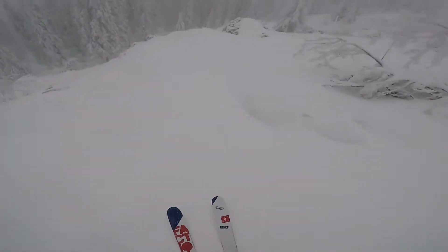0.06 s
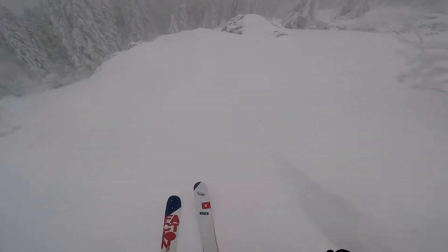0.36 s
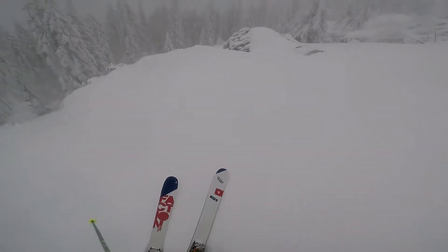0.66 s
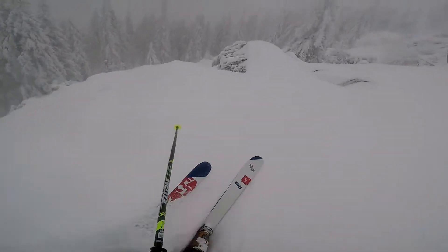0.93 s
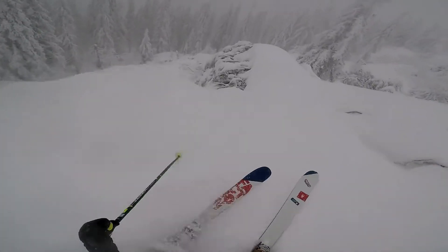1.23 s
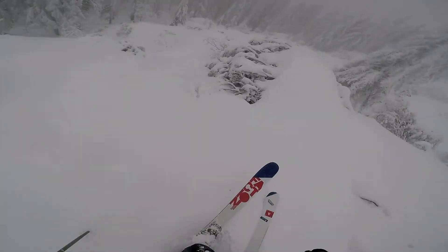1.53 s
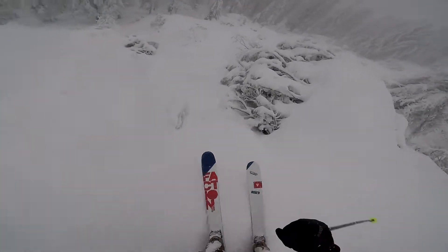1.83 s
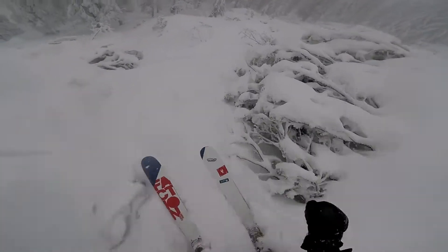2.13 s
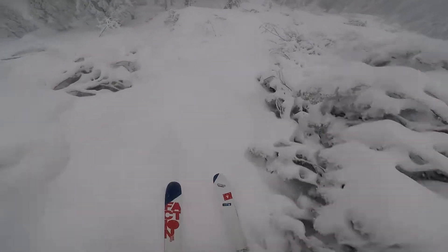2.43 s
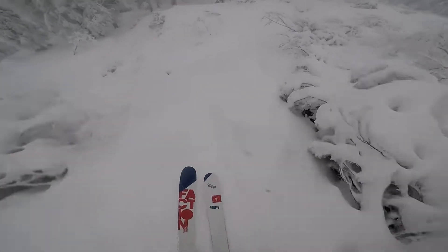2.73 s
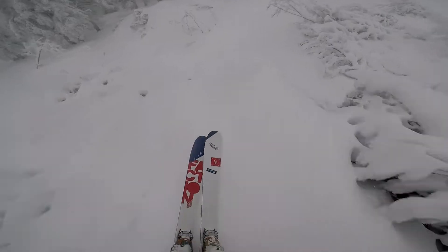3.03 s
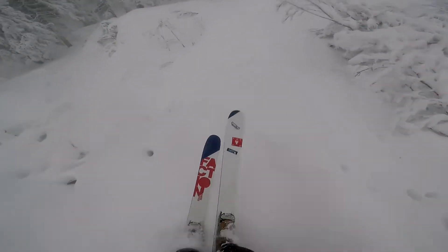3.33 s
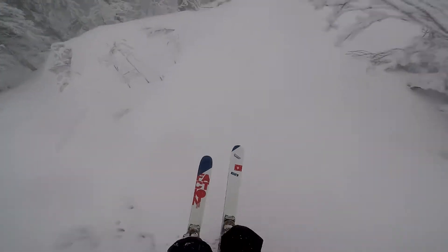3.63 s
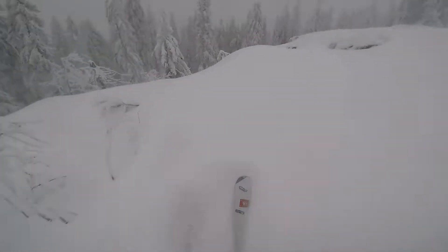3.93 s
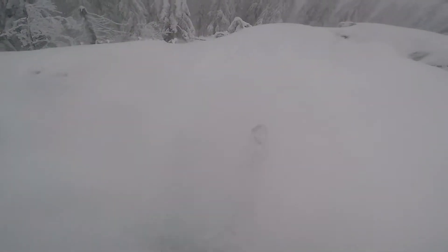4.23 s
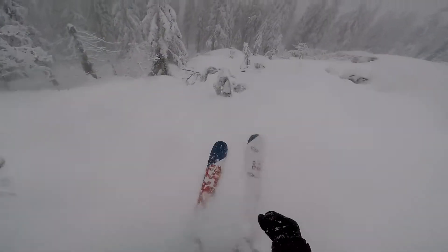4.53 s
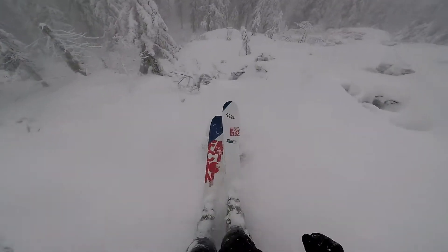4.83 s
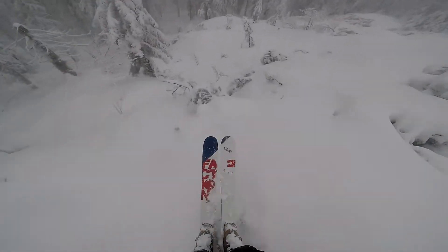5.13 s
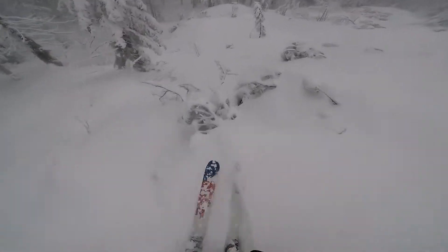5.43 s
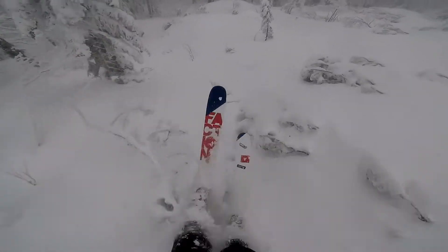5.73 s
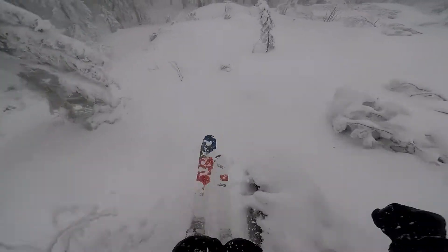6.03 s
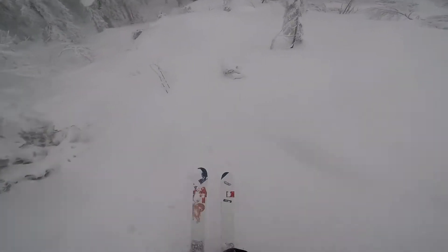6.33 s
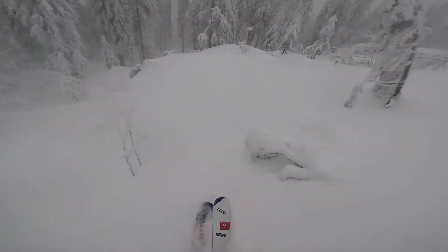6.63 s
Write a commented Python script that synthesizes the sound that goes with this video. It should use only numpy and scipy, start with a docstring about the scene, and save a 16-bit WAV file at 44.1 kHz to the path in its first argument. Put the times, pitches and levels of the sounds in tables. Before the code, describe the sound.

Close, rough gusts of wind hit a body-worn microphone on a run down a snowy slope. Skis surge through the powder, each push a grinding swish with a hiss of spray and a faint hollow ring. Crust crunches, the skis click and clack, and the camera mount takes a few low knocks. The wind is strongest at the start, in the middle and at the end, with a rumble underneath throughout.

```python
"""Buffeting gusts over a low rumble: air tumbles across the microphone of a camera worn by a skier
in deep powder. With each turn the skis grind through collapsing snow, ring faintly in their bending
modes and throw a hissing spray. Crust crunches, sharp taps and edge bites clack, bumps knock the
camera mount and a fine high sizzle comes and goes. The camera dulls its top octave in loud stretches."""
import sys
import numpy as np
from scipy import signal
from scipy.fft import rfft, irfft
from scipy.io import wavfile
from scipy.ndimage import uniform_filter1d, minimum_filter1d, map_coordinates

SR = 44100
rng = np.random.default_rng(int(sys.argv[2]) if len(sys.argv) > 2 else 0)


def generate_wav(sig):
    """Save sig (samples, or channels by samples) to the path in sys.argv[1] as 16-bit PCM at SR."""
    pcm = np.round(np.clip(np.atleast_2d(sig).T, -1, 1) * 32767).astype(np.int16)
    wavfile.write(sys.argv[1], SR, pcm)


N = 294588

# turbulence spectrum: (frequency [multiple of eddy rate], level [dB])
EDDY_SPECTRUM = [(.05, 3), (.3, -1), (.7, -3.5), (1, -5.5), (1.5, -9.5), (2.3, -14), (3.2, -25.5),
                 (5, -32.5), (10, -64), (30, -91)]
# gusts at the microphone: (peak [s], rise [s], fall [s], level [dB], eddy rate [Hz])
AIR_GUSTS = [(.23, 0.077, 0.072, -15, 750.1), (.34, .07, 0.061, -16, 279.8), (.48, 0.064, .13, -12, 470),
             (.74, .16, 0.12, -14.5, 650), (.89, 0.048, .055, -20.5, 950.2), (1.699, .12, .08, -37, 650),
             (2.77, 0.34, 0.045, -24.5, 400.1), (2.87, 0.047, 0.051, -15.5, 601.2),
             (2.96, 0.051, .07, -16, 1300), (3.35, .06, 0.18, -14.5, 947.6), (3.73, .08, 0.057, -10, 720),
             (3.829, .06, .13, -13.5, 382), (4.48, .1, 0.2, -25, 752.4), (5.08, .06, 0.1944, -29, 450.3),
             (5.40, 0.063, .07, -14, 259.7), (5.48, .22, .15, -25, 760.8), (5.75, .05, 0.098, -30, 301.3),
             (6.02, .1, 0.062, -23, 400.2), (6.191, 0.066, .11, -13.5, 461), (6.42, .12, 0.085, -9.5, 250),
             (6.50, .06, 0.21, -18, 700)]


def gusts(level_db=-2, swing_db=3, speed_swing=.17, breeze_db=-50, breeze_hz=650):
    """A frozen pattern of eddies sweeps past: faster air is both louder and brighter."""
    pattern_hz, slowing_oct_per_db = 600, .01
    power = gain_of(breeze_db) ** 2
    weighted_hz = power * breeze_hz
    for *timing, db, hz in AIR_GUSTS:
        envelope_db = swell_db(*timing)
        gust_power = gain_of(db + envelope_db) ** 2
        power += gust_power
        weighted_hz += gust_power * hz * 2 ** (slowing_oct_per_db * envelope_db)
    eddy_hz = weighted_hz / power
    surge = 2 * np.tanh(flutter(rate_hz=65.3) / 2)
    pattern = coloured(rng.standard_normal(N), EDDY_SPECTRUM, pattern_hz)
    speed = eddy_hz / pattern_hz * np.exp(speed_swing * (surge - .5))
    pressure = map_coordinates(pattern, [np.cumsum(speed) % N], order=3, mode="grid-wrap")
    pressure *= unit_rms(gain_of(swing_db * surge)) * np.sqrt(power) * gain_of(level_db)
    return signal.sosfilt(signal.butter(2, 110, "high", fs=SR, output="sos"), pressure)


# hard eddies slapping the microphone: (time [s], level [dB], pitch [Hz], decay [s])
EDDY_SLAPS = [(0.3724, -1, 196, 0.0028), (.435, -9, 546, 0.0017), (.47, -6, 173, 0.0016),
              (.586, -4, 205, .003), (0.6359, -5.5, 800, 0.0006), (.705, -9, 408, 0.003),
              (0.778, -6.5, 480, 0.0025), (2.859, -10, 305, 0.0021), (3.1467, -9, 410, 0.0025),
              (3.303, -8.5, 692, 0.0034), (3.33, -9, 635, 0.0029), (3.6292, -20, 709, 0.002),
              (3.693, -5.5, 584, 0.0026), (3.727, -12, 599, 0.0033), (3.744, -14, 469, 0.0022),
              (3.766, 0, 402.4, 0.0021), (3.803, -3, 298.2, .0067), (6.09, -17, 600, .002),
              (6.1542, -11, 658.6, 0.0017), (6.21, -13, 191.8, 0.0049), (6.406, -4, 202.5, 0.0086),
              (6.4437, -5.5, 453.3, 0.0049)]


def buffets(tearing=.81):
    """Each hard eddy is a sudden suction with torn air in it; small eddies sound higher."""
    out = np.zeros(N)
    for time_s, db, hz, decay_s in EDDY_SLAPS:
        t, slap = burst(decay_s, rise_s=.0008)
        torn_air = coloured(rng.standard_normal(len(t)), EDDY_SPECTRUM, hz)
        suction = -np.sin(2 * np.pi * hz * t)
        add(out, time_s, gain_of(db) * slap * (tearing * torn_air + suction))
    return out


# large eddies round the skier: (time [s], level [dB])
WAKE_LEVELS = [(0.0, -27.5), (.33, -19), (.7, -20), (1.1, -34.5), (1.35, -25), (2.3, -31.5), (2.55, -24),
               (3.3, -19.5), (3.5, -25.5), (3.85, -16), (4.1, -25), (4.25, -42), (4.4, -29), (4.7, -33.5),
               (5.15, -34.5), (5.53, -21), (5.93, -29), (6.18, -16), (6.68, -24.5)]
# pressure swings as the body rises and sinks: (peak [s], rise [s], fall [s], level [dB])
BODY_HEAVES = [(.17, .07, .08, -20), (1.40, 0.049, .07, -14.5), (2.15, 0.083, 0.072, -13),
               (3.0, 1, 0.75, -20.5), (4.12, 0.16, 0.069, -20), (4.72, 0.19, 0.095, -24.5),
               (5.56, 0.18, 0.11, -17.5), (6.02, 0.23, .2, -21.5), (6.55, .1, .15, -22)]
# spectra of rumble and heave: (frequency [Hz], level [dB])
RUMBLE_SPECTRUM = [(25, -26), (55, -1.5), (90, 1), (140, 1), (200, -7), (300, -16), (500, -29.5),
                   (1000, -58), (3000, -59), (12000, -100)]
HEAVE_SPECTRUM = [(3, -21), (12, -4), (25, -3), (45, -11), (70, -29), (200, -67), (1000, -110)]


def wake(rumble_db=-.5, heave_db=-1, calm_db=-33, lumps_db=3):
    """Large slow eddies: a lumpy rumble over a heaving pressure."""
    wake_db, = curves(WAKE_LEVELS)
    rumble = coloured(rng.standard_normal(N), RUMBLE_SPECTRUM)
    rumble = unit_rms(rumble * gain_of(lumps_db * flutter(rate_hz=20)))
    heave = coloured(rng.standard_normal(N), HEAVE_SPECTRUM) * swells(BODY_HEAVES, gain_of(calm_db))
    return rumble * gain_of(wake_db + rumble_db) + heave * gain_of(heave_db)


# skis pressing into snow: (peak [s], rise [s], fall [s], grind [dB], spray [dB], ring [dB])
SKI_PUSHES = [(.24, 0.16, 0.057, -49, -41.5, -43), (.56, 0.17, 0.16, -24.5, -60, -42),
              (1.03, 0.27, 0.053, -36, -45.5, -64), (1.686, 0.03, 0.021, -48, -59, -30.5),
              (1.79, 0.026, 0.15, -24, -35.5, -32), (1.92, 0.047, 0.053, -18, -27.5, -27),
              (2.03, .02, 0.032, -36, -31.5, -28), (2.16, 0.095, 0.052, -42, -31.5, -27),
              (2.512, 0.089, 0.064, -20, -34, -26), (2.66, 0.16, 0.12, -29.5, -30, -37.5),
              (2.855, 0.021, 0.088, -23, -30, -24.5), (2.96, .05, 0.052, -27, -31, -38),
              (3.064, 0.013, 0.03, -30, -32, -44), (3.177, 0.009, 0.18, -17, -27.5, -24),
              (3.28, 0.097, 0.065, -16, -31, -19), (3.62, 0.067, 0.27, -27, -56, -34),
              (4.29, 0.054, 0.085, -30.5, -58, -48), (4.54, 0.062, 0.087, -21, -35.5, -19.5),
              (4.64, 0.11, 0.17, -30, -34, -38.5), (5.04, 0.016, 0.17, -39.5, -38, -34),
              (5.14, 0.077, .035, -24, -36.5, -40), (5.259, 0.019, 0.047, -25, -44, -40),
              (5.40, 0.045, 0.075, -22.5, -30, -36), (5.54, 0.13, 0.074, -21, -28.5, -21.5),
              (5.714, 0.051, 0.044, -23, -32, -29), (6.16, 0.024, 0.017, -16, -28, -20.5),
              (6.219, 0.025, 0.064, -24.5, -33.5, -26.5)]
# glide between pushes: (time [s], grind [dB], spray [dB])
SKI_GLIDE = [(0.0, -27.5, -40), (.8, -29, -56), (1.15, -38, -52.5), (1.35, -38, -52.5),
             (1.65, -35.5, -44.5), (2.3, -33.5, -39.5), (3.1, -33, -43.5), (3.6, -35, -54),
             (4.0, -33, -48.5), (4.15, -37.5, -46.5), (4.4, -38, -56), (4.95, -39, -45), (5.8, -29, -36),
             (6.08, -38, -43), (6.4, -27.5, -46), (6.68, -25.5, -46.5)]
# spectra of grinding and flying snow: (frequency [Hz], level [dB])
GRIND_SPECTRUM = [(60, -26), (120, 0.5), (300, 1), (650, -4), (1150, -4), (1400, -2), (1650, 1.5),
                  (2200, -3.5), (2700, -8), (3300, -7), (5000, -16.5), (9000, -41), (12000, -71),
                  (16000, -71)]
SPRAY_SPECTRUM = [(100, -43), (300, -4.5), (1200, -14.5), (2000, -8.5), (3400, 2), (4800, -2.5),
                  (6200, -1.5), (8800, -5.5), (10200, -12.5), (11500, -26.5), (15500, -39)]


def skis(grind_db=-6, spray_db=-5, grind_judder_db=2.5, spray_judder_db=1, side_db=-23):
    """Snow collapses in clumps under the skis and flies off as spray, a little of it sideways."""
    grind_gain, spray_gain, _ = ski_gains()
    clumps = flutter(rate_hz=17.5)
    grind = coloured(crystals(per_s=4000, spread_db=2.5, hiss=1, cycles=6.116), GRIND_SPECTRUM)
    spray = coloured(crystals(per_s=9000, spread_db=3.5, hiss=.8, cycles=6), SPRAY_SPECTRUM)
    grind = unit_rms(grind * gain_of(grind_judder_db * clumps)) * grind_gain * gain_of(grind_db)
    spray = unit_rms(spray * gain_of(spray_judder_db * clumps))
    side = gain_of(side_db) * coloured(rng.standard_normal(N), SPRAY_SPECTRUM)
    return grind + np.array([spray + side, spray - side]) * spray_gain * gain_of(spray_db)


def ski_gains():
    """Grind, spray and ring envelopes: all swell with each push; gliding sustains the first two."""
    glide_grind, glide_spray = gain_of(curves(SKI_GLIDE))
    grind = swells([(*timing, db) for *timing, db, _, _ in SKI_PUSHES], glide_grind)
    spray = swells([(*timing, db) for *timing, _, db, _ in SKI_PUSHES], glide_spray)
    ring = swells([(*timing, db) for *timing, _, _, db in SKI_PUSHES])
    return grind, spray, ring


def crystals(per_s, spread_db, hiss, cycles, pitches=20):
    """Countless tiny fractures, brief pings of many pitches and sizes, blur into a hiss."""
    out = np.zeros(N)
    for hz in np.geomspace(500, 13000, pitches):
        t = np.arange(int(cycles * SR / hz) + 4) / SR
        ping = signal.windows.hann(len(t)) * np.sin(2 * np.pi * hz * t)
        when, size_quantile = rng.random((int(per_s * N / SR / pitches), 2)).T
        size_db = spread_db * np.minimum(-np.log1p(-size_quantile), 4)  # capped exponential
        cracks = np.bincount((when * N).astype(int), gain_of(size_db), N)
        out += np.sqrt(hz) * unit_rms(signal.oaconvolve(cracks, ping, "same"))
    return unit_rms(out) + hiss * rng.standard_normal(N)


# bending modes of the two skis: (frequency [Hz], width [Hz], level [dB])
BENDING_MODES = [(1404, 240, 1), (1574, 111, 6.5), (1621, 137, 3), (1950, 170, -2)]


def chatter(level_db=-1.5, judder_db=3):
    """Uneven slipping over the snow rings the skis with a hollow note."""
    _, _, ring_gain = ski_gains()
    slips = rng.standard_normal(N) * gain_of(judder_db * flutter(rate_hz=46))
    ring = np.zeros(N)
    for hz, width_hz, db in BENDING_MODES:
        mode = signal.butter(2, [hz - width_hz / 2, hz + width_hz / 2], "band", fs=SR, output="sos")
        ring += gain_of(db) * unit_rms(signal.sosfilt(mode, slips * rng.choice([-1, 1], N)))
    return unit_rms(ring) * ring_gain * gain_of(level_db)


# skis breaking through firmer snow: (time [s], level [dB], decay [s])
CRUST_BREAKS = [(1.232, -29.5, 0.014), (1.683, -38, 0.0083), (1.755, -18, 0.0081), (1.8175, -25, 0.022),
                (2.0224, -26.5, 0.018), (2.082, -22, 0.0098), (2.107, -24.5, 0.0085), (2.159, -24, 0.012),
                (2.376, -20, 0.014), (2.452, -20.5, 0.0054), (2.842, -24, 0.0066), (3.1682, -19.5, 0.0044),
                (5.017, -21, 0.009), (5.0469, -25, 0.019), (5.342, -26.5, 0.0087), (5.61, -20.5, 0.01),
                (5.663, -23, 0.01), (5.7091, -22, .011), (6.1518, -34, 0.0098)]


def crunches(level_db=-1, spray_db=-12, crumbs_per_s=14, crumb_db=-10, crumb_spread_db=2):
    """Firm snow gives way in a dense burst of fractures; small crumbs crack under the skis' load."""
    force = np.zeros(N)
    for time_s, db, decay_s in CRUST_BREAKS:
        _, collapse = burst(decay_s, rise_s=.00014)
        add(force, time_s, gain_of(db + level_db) * collapse)
    cracks = rng.standard_normal(N)
    crumb_onsets = rng.random(N) < crumbs_per_s / SR
    crumb_sizes = gain_of(crumb_db + crumb_spread_db * np.minimum(rng.exponential(1, N), 2))
    _, snap = burst(decay_s=.0024, rise_s=.00016)
    load, _, _ = ski_gains()
    force += load * signal.oaconvolve(crumb_onsets * crumb_sizes, snap)[:N]
    spray = gain_of(spray_db) * coloured(cracks, SPRAY_SPECTRUM)
    return force * (coloured(cracks, GRIND_SPECTRUM) + spray)


# sharp taps and edge bites, plus one thin high click during a strong gust:
# (time [s], level [dB], pitch [Hz], decay [s])
SHARP_TAPS = [(.0475, -21, 2954, 0.00069), (0.183, -29, 2180, 0.0011), (0.252, -19.5, 3900, 0.0012),
              (0.475, -30, 3800, 0.022), (.626, -30.5, 8940, .0006), (1.2316, -23, 3050, 0.0025),
              (1.238, -23.5, 1750, 0.0064), (1.2456, -24.5, 3470, 0.0016), (1.6922, -23.5, 4900, 0.00094),
              (2.183, -20, 3760, .0016), (2.455, -9.5, 1540, 0.0037), (2.4852, -20.5, 1560, 0.0034),
              (2.697, -20.5, 4700, 0.0024), (2.845, -14.5, 1640, 0.002), (3.1719, -21.5, 1740, 0.03),
              (3.172, -29.5, 3430, 0.054), (4.0912, -29, 2287, 0.022), (4.103, -15.5, 1950, 0.0039),
              (4.1021, -16.5, 4260, 0.0024), (4.179, -45, 7240, 0.0011), (4.8, -22, 1950, .002),
              (5.017, -25.5, 3100, 0.0038), (5.086, -30.5, 9460, 0.0014), (5.1053, -19, 2120, .0022),
              (5.104, -24, 5170, 0.0016), (5.381, -36, 8600, .018), (5.52, -36.5, 6200, 0.064),
              (5.5699, -13, 1700, 0.0028), (5.709, -26, 3230, 0.008), (6.208, -19, 2010, 0.0049),
              (6.392, -20, 2566, 0.003), (6.4227, -27.5, 4958, 0.0017), (6.5502, -17, 2009, 0.0026)]


def clacks(level_db=2, edge_ratio=1.21, rattle=2.5):
    """One sharp impulse and a brief rattle through a broad, damped resonance."""
    out = np.zeros(N)
    for time_s, db, hz, decay_s in SHARP_TAPS:
        t, envelope = burst(decay_s, rise_s=.000081)
        impulse = unit_rms(t == 0)
        rattling = rattle * unit_rms(envelope * rng.choice([-1, 1], len(t)))
        resonance = signal.butter(2, [hz / edge_ratio, hz * edge_ratio], "band", fs=SR, output="sos")
        ring = signal.sosfilt(resonance, impulse + rattling)
        ring *= np.linalg.norm(envelope) / np.linalg.norm(ring)
        add(out, time_s, gain_of(db + level_db) * ring)
    return out


# bumps on the mount: (time [s], level [dB], pitch [Hz], decay [s], knock [dB re wobble])
MOUNT_BUMPS = [(1.2782, -31, 194, 0.0027, 9.5), (1.678, -10.5, 172, 0.012, -16),
               (2.551, -13, 94.2, 0.014, -9), (4.105, -9.5, 140.4, 0.013, -21),
               (4.802, -10, 169, 0.015, -9), (5.055, -16.5, 164, 0.022, -5),
               (5.382, -16, 188.5, 0.0199, -17), (5.7223, -9, 161, 0.0042, -24.5),
               (5.797, -12, 172.6, 0.013, -11.5), (6.028, -11, 169.2, 0.015, -29)]


def thumps(level_db=2, knock_hz=600):
    """A bump knocks the camera mount, which then wobbles for a few cycles."""
    out = np.zeros(N)
    t, blow = burst(decay_s=.00089, rise_s=.002)
    knock = blow * np.sin(2 * np.pi * knock_hz * t)
    for time_s, db, hz, decay_s, knock_db in MOUNT_BUMPS:
        _, envelope = burst(decay_s, rise_s=.0012)
        wobble = envelope * np.sin(2 * np.pi * hz * t)
        add(out, time_s, gain_of(db + level_db) * (wobble + gain_of(knock_db) * knock))
    return out


# swells of fine sizzle: (peak [s], rise [s], fall [s], level [dB])
SIZZLE_SWELLS = [(.08, .2, 0.156, -62), (2.67, 0.17, .1, -56.5), (2.92, .12, 0.09, -57),
                 (5.40, 0.044, .04, -49), (5.58, 0.35, 0.38, -53), (6.18, 0.051, 0.067, -51)]
# brief ticks: (time [s], level [dB])
SIZZLE_TICKS = [(.066, -45), (.2515, -45), (2.184, -55), (2.697, -47), (5.087, -38)]
# spectrum of both: (frequency [Hz], level [dB])
SIZZLE_SPECTRUM = [(2000, -18), (6500, -50), (9000, -6), (10500, 7), (11400, 5), (12400, 16), (14000, 11),
                   (15300, 5), (16500, -28)]


def sizzle(level_db=4, flicker_db=4.5, pan_db=3.5):
    """A fine high sizzle with brief ticks, set louder in the right channel."""
    envelope = swells(SIZZLE_SWELLS)
    _, tick = burst(decay_s=.0019, rise_s=.0002)
    for time_s, db in SIZZLE_TICKS:
        add(envelope, time_s, gain_of(db) * tick)
    noise = rng.standard_normal((2, N)) * gain_of(flicker_db * flutter(rate_hz=620))
    hiss = np.array([coloured(channel, SIZZLE_SPECTRUM) for channel in noise])
    return hiss * envelope * gain_of([[level_db - pan_db], [level_db + pan_db]])


def gain_of(db):
    """Decibels to amplitude."""
    return 10 ** (np.asarray(db) / 20)


def unit_rms(x):
    """Scales to rms 1."""
    return x / np.sqrt(np.mean(x ** 2) + 1e-20)


def coloured(x, spectrum, unit_hz=1):
    """Filters x by a spectrum interpolated over log frequency; rms 1."""
    points, db = np.transpose(spectrum)
    hz = np.fft.rfftfreq(len(x), 1 / SR)
    response_db = np.interp(np.log(hz + 1), np.log(points * unit_hz), db)
    return unit_rms(irfft(rfft(x) * gain_of(response_db), len(x)))


def curves(rows):
    """Columns of a timed table, interpolated per sample."""
    time_s, *columns = np.transpose(rows)
    return [np.interp(np.arange(N) / SR, time_s, column) for column in columns]


def flutter(rate_hz):
    """Random wavering up to about rate_hz; rms 1."""
    ratio = np.fft.rfftfreq(N, 1 / SR) / rate_hz
    band = ratio / (ratio + .1) / np.sqrt(1 + ratio ** 4)
    return unit_rms(irfft(rfft(rng.standard_normal(N)) * band, N))


def burst(decay_s, rise_s):
    """Time axis and envelope of a blow: rounded rise to 1, exponential fall."""
    t = np.arange(SR // 5) / SR
    envelope = (1 - np.exp(-(t / rise_s) ** 2)) * np.exp(-t / decay_s)
    return t, envelope / envelope.max()


def swell_db(peak_s, rise_s, fall_s, roundness=1.4):
    """Level re peak: -10 dB at rise_s before it and fall_s after it."""
    t = np.arange(N) / SR - peak_s
    return -10 * np.minimum(np.maximum(-t / rise_s, t / fall_s) ** roundness, 10)


def swells(rows, floor=0):
    """Gain of swells summed in power over a floor."""
    return np.sqrt(floor ** 2 + sum(gain_of(db + swell_db(*timing)) ** 2 for *timing, db in rows))


def add(mix, time_s, sound):
    """Mixes a sound in at time_s."""
    part = mix[round(time_s * SR):][:len(sound)]
    part += sound[:len(part)]


def muffled(x, edge_hz, cut_db_per_db, threshold_db, follow_s):
    """The camera turns its top octave down while the sound stays loud, then slowly restores it."""
    pole = np.exp(-1 / (follow_s * SR))
    power = signal.lfilter([1 - pole], [1, -pole], (x ** 2).mean(axis=0))
    over_db = np.maximum(10 * np.log10(power + 1e-12) - threshold_db, 0)
    treble = signal.sosfiltfilt(signal.butter(4, edge_hz, "high", fs=SR, output="sos"), x)
    return x - treble * (1 - gain_of(-cut_db_per_db * over_db))


def scene():
    """Wind, snow and knocks; only the skis' spray and the sizzle have stereo width."""
    wind = gusts() + buffets() + wake()
    return wind + skis() + chatter() + sizzle() + crunches() + clacks() + thumps()


def record(dry, ceiling=.87, cutoff_hz=15500):
    """Treble cut when loud, smooth peak limiter, band limit."""
    dry = muffled(dry, edge_hz=8000, cut_db_per_db=2.5, threshold_db=-19, follow_s=.36)
    allowed_gain = np.minimum(1, ceiling / (abs(dry).max(axis=0) + 1e-9))
    held_gain = minimum_filter1d(allowed_gain, size=181)
    smooth_gain = uniform_filter1d(uniform_filter1d(held_gain, size=91), size=91)
    soft_ends = signal.windows.tukey(N, .001)
    lowpass = signal.firwin(511, cutoff_hz, window=("kaiser", 9), fs=SR)
    return signal.oaconvolve(dry * smooth_gain * soft_ends, lowpass[None], "same", axes=1)


dry = scene()
out = record(dry)
generate_wav(out)
```